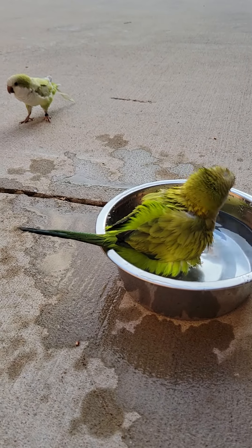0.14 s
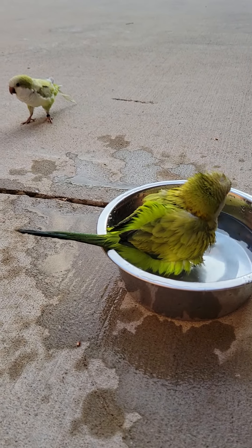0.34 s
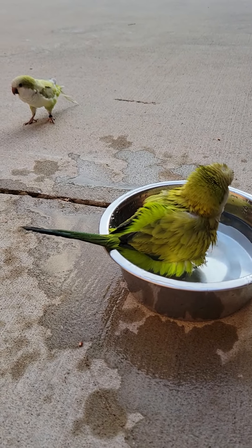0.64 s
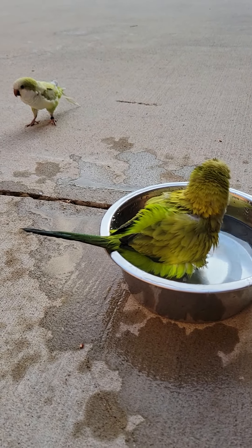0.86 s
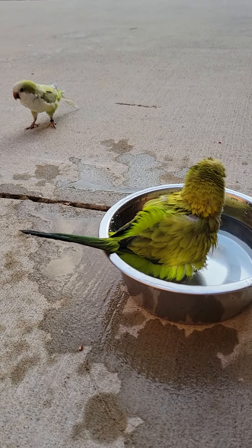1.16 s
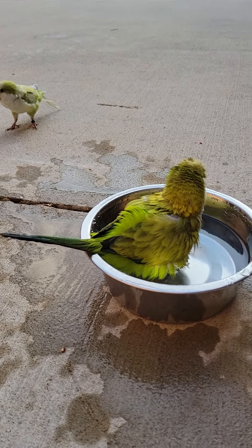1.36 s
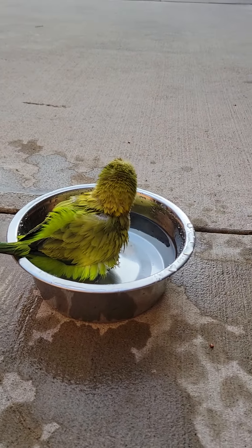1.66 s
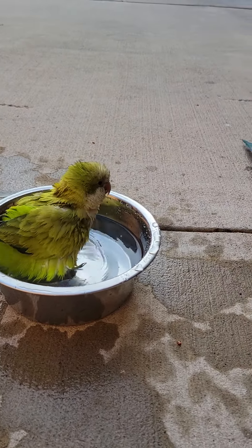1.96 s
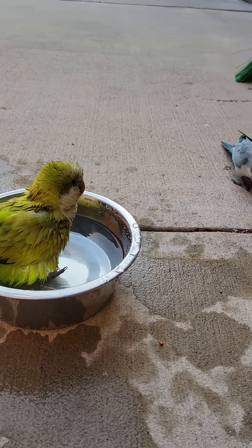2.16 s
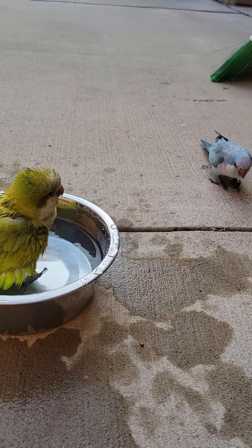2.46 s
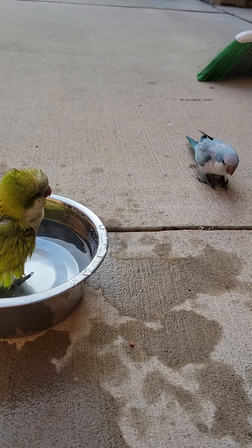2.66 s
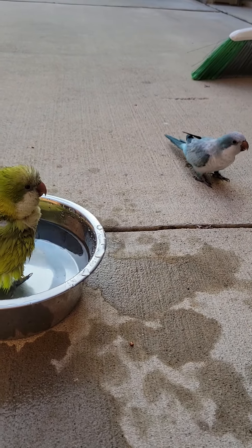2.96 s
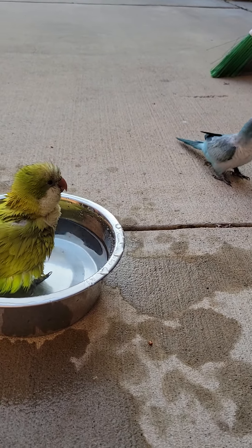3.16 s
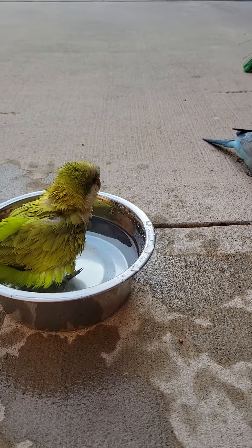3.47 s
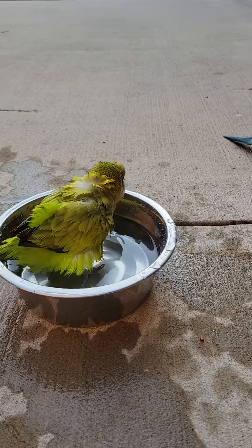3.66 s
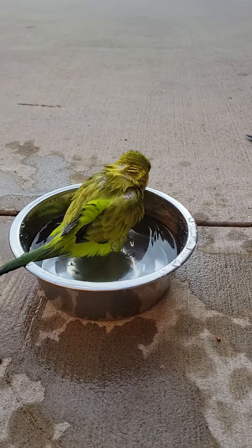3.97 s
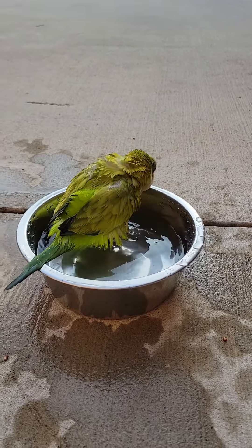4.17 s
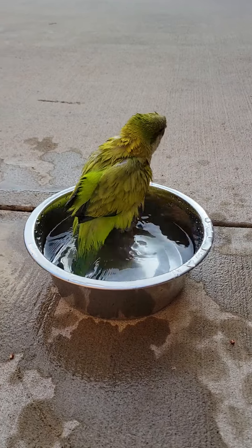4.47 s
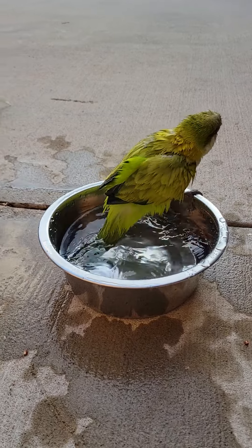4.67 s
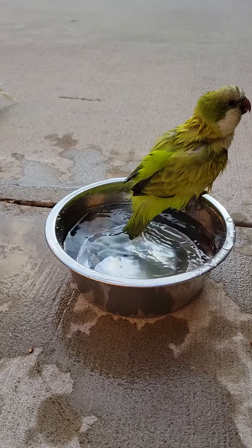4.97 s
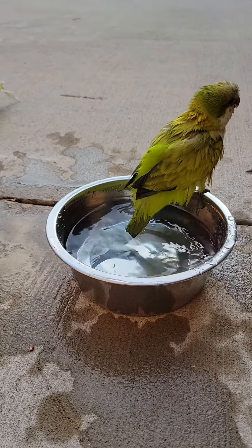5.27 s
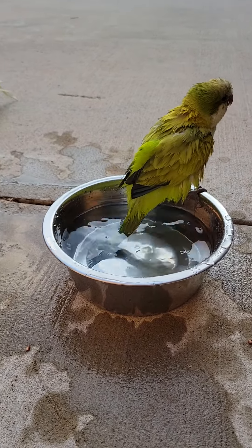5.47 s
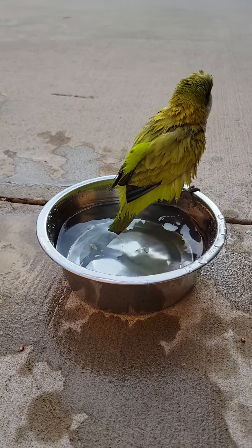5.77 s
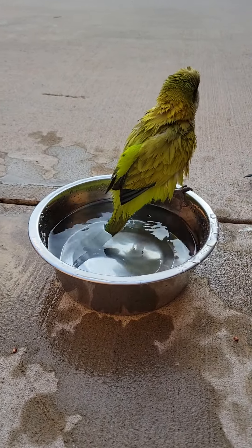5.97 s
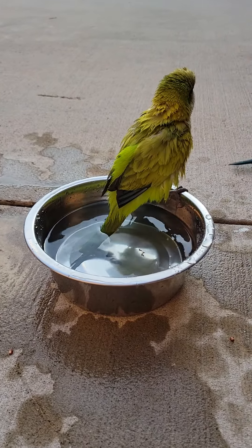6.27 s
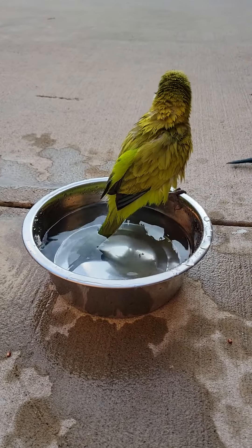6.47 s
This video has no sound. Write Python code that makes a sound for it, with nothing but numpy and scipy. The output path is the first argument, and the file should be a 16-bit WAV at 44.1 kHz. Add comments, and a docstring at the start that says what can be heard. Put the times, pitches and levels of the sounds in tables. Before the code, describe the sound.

A low, slightly throbbing machine hum and soft, dull outdoor air run throughout on a hard-surfaced patio. A parakeet very near the microphone squawks at 0.0, 0.4 and 0.9 s, each call a harsh, raspy trill of about 0.1 to 0.17 s, flipping rapidly between buzz and rising whistle, with bright slap reflections. A faint latch click comes at 1.9 s and a soft low bump at 2.3. The fourth squawk bursts out at 2.5 s. Thin, quiet hinge squeals waver and overlap from 2.7 to 3.65 s; a click at 3.8 precedes the last, lower, rougher squawk at 3.9. Squeaking resumes at 4.2 s, rising, then falling through 5.2, with small clacks. At about 5.3 s the door bumps shut: metallic bolt clack, rapid wooden shudder and deep boom dying away. From 5.5 to 6.6 s a faint, distant high whine rises slightly, dips in level, swells and fades.

```python
"""A parakeet squawks five times over the hum of a machine and soft air on a concrete patio.
A door unlatches, squeals on its hinges and bumps shut; a thin, high whine follows.
Bird: ragged pulses and noise through throat and beak resonances. Hum: wavering sines; air: coloured noise.
Hinges: sines with overtones on arcs of pitch. Latch and panel: decaying noise bursts. Boom: decaying modes.
Whine: one wavering sine. Reflections are decaying noise, convolved with the sound."""
import sys
import numpy as np
from scipy import signal
from scipy.fft import rfft, irfft, next_fast_len
from scipy.io import wavfile
from scipy.ndimage import uniform_filter1d, map_coordinates

SR = 44100
rng = np.random.default_rng(int(sys.argv[2]) if len(sys.argv) > 2 else 0)


def persist_wave(psi):
    """Save psi, clipped to +-1, as 16-bit WAV."""
    counts = np.round(np.clip(psi, -1, 1) * 32767).astype(np.int16)
    wavfile.write(sys.argv[1], SR, np.atleast_2d(counts).T)


N = 291942
T = np.arange(N) / SR
CUTOFF_HZ = 16200
RELEASE_S = 0.005  # fade at the ends of squawks and whine


def from_db(db):
    """Decibels to gain."""
    return 10 ** (np.asarray(db) / 20)


def rms_one(x):
    """Scale to unit rms."""
    return x / np.sqrt(np.mean(x ** 2) + 1e-20)


def at_hz(points, hz):
    """Read a spectrum on a log-frequency axis."""
    f, value = np.transpose(points)
    return np.interp(np.log(np.maximum(hz, 1)), np.log(f), value)


def coloured(x, points):
    """Pass a sound through a smooth (Hz, dB) response."""
    size = next_fast_len(x.shape[-1])
    gain = from_db(at_hz(points, np.fft.rfftfreq(size, 1 / SR)))
    return irfft(rfft(x, size) * gain, size)[..., :x.shape[-1]]


def drift(rate, size):
    """Smooth chance, spread about 1, that changes about `rate` times a second."""
    steps = np.arange(size) * rate / SR
    return map_coordinates(rng.standard_normal(int(steps[-1]) + 2), [steps], order=2, mode="nearest")


def span(start, length):
    """The samples that an event covers, with a margin."""
    return slice(max(0, int(start * SR) - SR // 20), min(N, int((start + length) * SR) + SR // 20))


def gate(age, length, edge_s):
    """Open for the length of an event, with fades just outside it."""
    return np.clip(1 + np.minimum(age, length - age) / edge_s, 0, 1)


def phase_of(hz):
    """Running phase of a moving frequency."""
    return 2 * np.pi * np.cumsum(hz) / SR


def patio(x, early_t60=0.16, late_db=-7.0):
    """Quick reflections from slab, wall and roof, then a long faint tail; different at each port."""
    # Each row: frequency in Hz, t60 of the tail in s.
    tail_t60 = [(100, 0.44), (4000, 0.71), (15000, 0.37)]
    hz, _, cells = signal.stft(rng.standard_normal((2, SR)), SR)
    age = np.linspace(0, 1, cells.shape[-1])
    early = from_db(-60 * age / early_t60)
    late = from_db(late_db - 60 * age / at_hz(tail_t60, hz)[:, None])
    echo = signal.istft(cells * (early + late), SR)[1]
    return signal.fftconvolve(x[None], rms_one(echo) / np.sqrt(SR), axes=1)[:, :N]


def background(air_db=-6.5, wander=0.83, throb_db=2.5):
    """Motor and fan lines waver over soft outdoor air, which is alike at both ports only in the bass."""
    # Machine hum lines. Each row: frequency in Hz, relative level in dB.
    hum_lines = [(53, -58.5), (77, -46), (91.5, -40.5), (129.5, -46.5), (156, -55), (183.3, -55.5),
                 (235.5, -54), (276.5, -53.5), (553, -67.5)]
    # Spectrum of the air. Each row: frequency in Hz, relative density in dB per Hz.
    air_colour = [(25, -15), (70, 4), (270, -6.5), (420, -17.5), (1300, -24.5), (5000, -36), (8000, -43.5),
                  (16000, -57)]
    # Each row: time in s, level of the hum in dB.
    hum_course = [(0, -42), (1.6, -43.5), (2.4, -40.5), (3.3, -40.5), (4.9, -41.5), (6.3, -39.5)]
    hum = np.zeros(N)
    for hz, db in hum_lines:
        gain = from_db(db + throb_db * drift(13, N))
        hum += gain * np.sin(2 * np.pi * hz * T + wander * drift(4.4, N))
    mid, side = coloured(rng.standard_normal((2, N)), air_colour)
    side = coloured(rms_one(side), [(100, -15.0), (400, 1.0)])
    air = (rms_one(mid) + side * [[1], [-1]]) * from_db(air_db)
    return (rms_one(hum) + air) * from_db(np.interp(T, *np.transpose(hum_course)))


def resonance(x, hz, width_hz):
    """Two-pole resonance with gain 1 on top."""
    r = np.exp(-np.pi * width_hz / SR)
    numerator = np.array([1, 0, -1]) * (1 - r * r) / 2
    return signal.lfilter(numerator, [1, -2 * r * np.cos(2 * np.pi * hz / SR), r * r], x)


def moving_resonance(x, hz, width_hz):
    """A resonance whose centre glides, gain about 1 on top."""
    r = np.exp(-np.pi * width_hz / SR)
    state, out = 0j, []
    for sample, pole in zip(x, r * np.exp(2j * np.pi * hz / SR)):
        state = state * pole + sample
        out.append(state.real)
    return 2 * (1 - r) * np.array(out)


def delayed(x, ms):
    """The same sound a little later."""
    n = np.arange(len(x))
    return np.interp(n - ms * SR / 1000, n, x, left=0, right=0)


def trill(t, course, first_flip_s, flips_per_s, whistle_hz):
    """Pitch, gain and throat peak of a squawk: a moving buzz flips up to a rising whistle at a steady rate."""
    whistle_start_share, whistle_db = 0.8, -1.5  # start as a share of the final pitch; level against the buzz
    early_share, late_share, steepness = 0.15, 0.56, 1.5  # share of each cycle spent in the whistle
    uneven_db, uneven_pitch, uneven_per_s = 1.3, 0.025, 160  # uneven air; pitch as a share
    s, *columns = np.transpose(course)
    effort_db, buzz_hz, throat_hz = (np.interp(t, s, column) for column in columns)
    age, length = t - s[0], s[-1] - s[0]
    progress = np.clip(age / length, 0, 1)
    rising_hz = whistle_hz * (whistle_start_share + (1 - whistle_start_share) * progress)
    share = early_share + (late_share - early_share) * progress
    cycle = np.cos(2 * np.pi * flips_per_s * (t - first_flip_s))
    threshold = np.cos(np.pi * share)
    flipped = (1 + np.tanh(steepness * (cycle - threshold))) / (1 + np.tanh(steepness * (1 - threshold)))
    level_db = effort_db + uneven_db * drift(uneven_per_s, len(t)) + flipped * whistle_db
    gain = gate(age - RELEASE_S, length - RELEASE_S, RELEASE_S) * from_db(level_db)
    pitch_hz = buzz_hz + (rising_hz - buzz_hz) * flipped
    return pitch_hz * (1 + uneven_pitch * drift(uneven_per_s, len(t))), gain, throat_hz


def squawk(pitch_hz, gain, throat_hz, pose, tilt=0.32, beak_width_hz=1500, notch_width_hz=1300):
    """Syrinx: ragged pulses and puffs of air, hoarser at low pitch, pass the moving throat and the beak."""
    # Each row: frequency in Hz, response in dB.
    voice_colour = [(400, -17.5), (1050, -7), (1700, -9), (2500, 0), (4700, -1.5), (6500, 2), (7900, -1.5),
                    (9500, -3), (11000, -15), (16000, -12)]
    jitter, shimmer, rasp_db, hoarse_hz = .012, .25, -13, 750
    slack_hz, throat_db, throat_width_hz = 1750, 5.5, 900
    size = len(pitch_hz)
    hoarse = 1 + 4 / (1 + (pitch_hz / hoarse_hz) ** 6)
    pitch_hz = pitch_hz * (1 + jitter * hoarse * drift(1000, size))
    phase = phase_of(pitch_hz)
    k = np.arange(1, 25)[:, None]
    # the tighter the membrane, the weaker the overtones above the second
    weights = np.maximum(k / 2, 1) ** (-tilt * (1 + (pitch_hz / slack_hz) ** 4))
    weights = weights * (k * pitch_hz < CUTOFF_HZ)
    pulses = rms_one(np.sum(weights * np.cos(k * phase), axis=0))
    pulses = pulses * (1 + shimmer * drift(1000, size))
    rasp = rms_one(rng.standard_normal(size) * (1 + np.cos(phase)))
    voice = coloured(pulses + from_db(rasp_db) * hoarse * rasp, voice_colour)
    low_db, beak_hz, beak_db, notch_hz = pose
    voice = coloured(voice, [(1350, low_db), (2100, 0.0032)])
    voice = voice + (from_db(throat_db) - 1) * moving_resonance(voice, throat_hz, throat_width_hz)
    voice = voice + (from_db(beak_db) - 1) * resonance(voice, beak_hz, beak_width_hz)
    voice = voice - resonance(voice, notch_hz, notch_width_hz)
    # all-pass: the windpipe smears each pulse
    voice = voice - 2 * resonance(voice, throat_hz.mean(), throat_width_hz)
    return gain * voice / np.sqrt(uniform_filter1d(voice ** 2, SR // 200) + 1e-12)


def parakeet(room_colour=1.0, balance_db=6.0):
    """Each squawk reaches the left port first and lights up the patio."""
    # Each row: first flip in s, flips per s, final whistle pitch in Hz.
    flip_rows = [(0.024, 34.0, 2480), (0.407, 36.6, 2800), (0.942, 33.4, 2380), (2.510, 34.8, 2680),
                 (3.934, 34.8, 2420)]
    # One list per squawk. Each row: time in s, effort in dB, buzz pitch in Hz, throat peak in Hz.
    courses = [
        [(-0.005, -16, 750, 4000), (0.019, -29, 850, 4000), (0.036, -18.5, 1000, 3600), (0.06, -23, 1750, 4300),
         (0.085, -19, 1650, 4800), (0.101, -22, 1450, 3000)],
        [(0.386, -35, 450, 3000), (0.399, -17, 1200, 4300), (0.415, -12, 1080, 4700), (0.457, -22, 1150, 4800),
         (0.472, -14.5, 1250, 4700), (0.498, -21, 1800, 4000), (0.52, -15, 1700, 5200),
         (0.532, -19, 1650, 3300)],
        [(0.915, -35, 450, 2400), (0.931, -18, 850, 2500), (0.948, -14, 1330, 2600), (0.964, -14, 1230, 2500),
         (0.985, -17.5, 1330, 4000), (1.015, -15, 1270, 2600), (1.043, -17, 1550, 5500),
         (1.063, -13.5, 1650, 4600), (1.082, -18, 1700, 3400)],
        [(2.491, -35, 450, 4200), (2.51, -21, 1130, 5800), (2.528, -13, 1050, 6000), (2.543, -23, 1150, 3300),
         (2.552, -18, 1170, 5800), (2.562, -29, 1200, 4800), (2.581, -13, 1210, 3700), (2.6, -21, 1650, 3200),
         (2.638, -14.5, 1780, 3600), (2.651, -25, 1800, 3600)],
        [(3.919, -36, 450, 2400), (3.942, -18.5, 790, 2400), (3.958, -15.5, 790, 2400), (3.982, -27, 750, 4200),
         (4.008, -22, 700, 4000), (4.022, -17, 1300, 4300), (4.049, -14, 1400, 4700), (4.06, -22, 1400, 3000)],
    ]
    # Head and beak. Each row: gain towards the microphone in dB, lead of the left port in ms,
    # low tones in dB, beak peak in Hz, beak peak in dB, beak notch in Hz.
    poses = [(1.5, 0.39, 6, 9700, 2, 9500), (2, .45, -1.5, 5500, 1, 9000),
             (1.5, .45, 5, 15000, 13.5, 11000), (2.5, 0.17, -1.5, 11000, 8, 7700),
             (1, 0.238, 0.5, 1880, 6, 7950)]
    # Colour of the two microphone ports. Each row: frequency in Hz, left minus right in dB.
    port_colours = [(500, -3.5), (1900, 2.5), (4200, 0.5), (6000, -14), (7200, -6), (8700, 2.5),
                    (10300, 0.5), (12800, 2.5), (15500, -8.5)]
    room_db = -6
    left, right = np.zeros((2, N))
    for flips, course, (gain_db, lead_ms, *pose) in zip(flip_rows, courses, poses):
        during = span(course[0][0], course[-1][0] - course[0][0])
        voice = from_db(gain_db) * squawk(*trill(T[during], course, *flips), pose)
        left[during] += voice
        right[during] += delayed(voice, lead_ms)
    ears = []
    for near, far, side in zip((left, right), patio(left), (.5, -.5)):
        near_colour = [(hz, side * (db + balance_db)) for hz, db in port_colours]
        far_colour = [(hz, side * db * room_colour) for hz, db in port_colours]
        ears.append(coloured(near, near_colour) + from_db(room_db) * coloured(far, far_colour))
    return np.array(ears)


def burst(s, colour, db, t60, attack_s=0.0045):
    """A dense cluster of resonances as coloured noise, set going at time s and dying away."""
    out, t = np.zeros(N), T[:SR // 2]
    envelope = np.minimum(t / attack_s, 1) * from_db(db - 60 * t / t60)
    noise = rms_one(coloured(rng.standard_normal(len(t)), colour))
    out[int(s * SR):int(s * SR) + len(t)] = noise * envelope
    return out


def knock(s, hz, db, t60):
    """A short blow that rings around one pitch."""
    return burst(s, [(hz / 2, -30), (hz, 0), (hz * 1.3, -20), (hz * 2, -45)], db, t60)


def latch(t60=0.037):
    """Short metallic clacks of latch and door fittings, each with its own brightness."""
    # Each row: start in s, relative level in dB, added treble in dB.
    clicks = [(1.934, -20, 2), (2.369, -31, -9), (3.8, -16.5, -2.5), (4.499, -17, -1.5), (4.701, -24, 33),
              (5.22, -11, -3.5), (5.314, -7.5, -11.5)]
    # Each row: frequency in Hz, relative density in dB per Hz before the added treble.
    click_colour = [(200, -21), (700, 5.5), (2200, -1), (6000, 1), (8000, -6), (16000, -9.5)]
    out = np.zeros(N)
    for s, level_db, treble_db in clicks:
        colour = [(hz, db + treble_db * (hz > 3000)) for hz, db in click_colour]
        out += burst(s, colour, level_db, t60)
    return out


def door_ring(modes, blows, t60, scatter_db=5.0):
    """Every bump sets the modes of the door ringing, with scattered strengths."""
    out, t = np.zeros(N), T[:SR // 2]
    hz, db = np.transpose(modes)[:, :, None]
    for s, blow_db in blows:
        strength = from_db(blow_db + db + scatter_db * rng.standard_normal(db.shape))
        ring = np.sum(strength * np.sin(2 * np.pi * hz * t), axis=0)
        out[int(s * SR):int(s * SR) + len(t)] += ring * from_db(-60 * t / t60)
    return out


def bumps(boom_db, panel_db, ring_t60):
    """The door bumps and shudders in its frame: panel noise with a pitched ring, and low boom modes."""
    # Each row: start in s, relative boom in dB, relative panel level in dB, panel ring in Hz.
    blows = [(2.259, -30.5, -47, 300), (4.515, -54, -39, 370), (5.285, -28, -26, 660),
             (5.308, -13.5, -34.5, 900), (5.371, -16.5, -27.5, 664), (5.420, -16.5, -29, 860),
             (5.474, -31, -27, 697)]
    # Boom modes. Each row: frequency in Hz, relative level in dB.
    boom_modes = [(35, -7.5), (71, -2.5), (125, -19)]
    # Panel noise. Each row: frequency in Hz, relative density in dB per Hz.
    panel_colour = [(100, 3), (340, 2), (470, -9), (780, -3), (1100, -15.5), (5000, -46)]
    panel = np.zeros(N)
    for s, _, db, ring_hz in blows:
        panel += burst(s, panel_colour, db + panel_db, t60=0.14)
        panel += knock(s, ring_hz, db, ring_t60)
    boom = door_ring(boom_modes, [(row[0], row[1] + boom_db) for row in blows], t60=0.54)
    return panel, boom


def squeal(row, waver, flutter_db, count=5):
    """Stick-slip: a thin tone and trembling overtones on one arc of pitch; it grows or fades, stops abruptly."""
    wander = 0.00697  # slow unsteadiness as a share of the pitch
    start, length, start_hz, halfway_hz, end_hz, level_db, growth_db, slope_db = row
    out, during = np.zeros(N), span(start, length)
    age = T[during] - start
    progress = np.clip(age / length, 0, 1)
    arc = 4 * progress * (1 - progress)
    pitch_hz = start_hz + (end_hz - start_hz) * progress + (halfway_hz - (start_hz + end_hz) / 2) * arc
    gain = gate(age, length, edge_s=0.0068) * from_db(level_db + growth_db * (progress - 2.0))
    phase = phase_of(pitch_hz * (1 + waver * drift(250.4, len(age)) + wander * drift(20, len(age))))
    for k in range(1, count + 1):
        tremble_db = flutter_db * min(k / 2, 1) * drift(25.0, len(age))
        out[during] += gain * from_db(slope_db * np.log2(k) + tremble_db) * np.sin(k * phase)
    return out


def hinges(squeal_db):
    """All stick-slip squeals, through one fixed colour."""
    # Each row: start in s, length in s, pitch at the start, halfway and at the end in Hz,
    # relative level in dB, growth in dB over the length, overtone slope in dB per octave.
    squeal_rows = [(2.669, 0.33, 1660, 1685, 1541, -51.5, -3, -11.5),
                   (2.964, 0.11, 1547, 1683, 1885, -49, 3, -12.5),
                   (2.818, 0.13, 2344, 2380, 2400, -53.5, 2, -10.5),
                   (2.934, 0.22, 2660, 2680, 2620, -47.5, 5, -16.5),
                   (3.07, 0.29, 2490, 2684, 2647, -47.5, 4.5, -16),
                   (3.363, 0.29, 1760, 1672, 1564, -45.5, 0.5, -14),
                   (4.194, 0.3, 1310, 2270, 2455, -58, -1, -10.5),
                   (4.521, 0.54, 2375, 2273, 1836, -52, 3.5, -11),
                   (4.533, 0.63, 2865, 2916, 2446, -52.5, 0.5, -22),
                   (5.041, 0.2, 2175, 1960, 1756, -43.5, 4.5, -10.5)]
    squeals = sum(squeal(row, waver=0.007, flutter_db=5.0) for row in squeal_rows)
    return coloured(squeals, [(2700, 2.5), (3600, 0), (5700, 13), (8500, 1.5)]) * from_db(squeal_db)


def door(squeal_db=0.0, click_db=-15.0, boom_db=-1.0, panel_db=-2.5, room_db=4.0, ring_t60=0.042):
    """Hinges, latch and panel get patio reflections; bolt and boom reach both ports alike, without them."""
    # The bolt drops into its plate: start in s, pitch in Hz, level in dB, t60 in s.
    bolt = (5.302, 2270, -8, 0.017)
    hinge_room_db, hinge_tail_db = 2, -10
    squeals = hinges(squeal_db)
    panel, boom = bumps(boom_db, panel_db, ring_t60)
    clatter = from_db(click_db) * latch() + panel
    direct = squeals + clatter + knock(*bolt) + boom
    clatter_room = patio(from_db(room_db) * clatter)
    return direct + clatter_room + from_db(hinge_room_db) * patio(squeals, late_db=hinge_tail_db)


def whine(waver=0.00835):
    """A far, wavering high tone, all reflections."""
    # Each row: time in s, pitch in Hz, level in dB ahead of the reflections.
    whine_course = [(5.529, 4650, -56), (5.661, 5065, -56), (5.87, 5220, -65.5), (6.12, 5167, -51),
                    (6.29, 5103, -50), (6.62, 4860, -73)]
    s, hz, db = np.transpose(whine_course)
    phase = phase_of(np.interp(T, s, hz) * (1 + waver * drift(250, N)))
    gain = gate(T - s[0], s[-1] - s[0], RELEASE_S) * from_db(np.interp(T, s, db))
    return patio(gain * np.sin(phase))


def scene():
    """Surroundings, bird, door and whine."""
    return background() + parakeet() + door() + whine()


def record(dry):
    """Peaks clip at full scale, then the top is cut."""
    low_pass = signal.ellip(10, .05, 60, CUTOFF_HZ, fs=SR, output="sos")
    return signal.sosfiltfilt(low_pass, np.clip(dry, -1, 1))


dry = scene()
out = record(dry)
persist_wave(out)
```